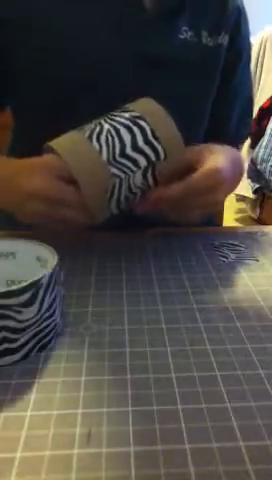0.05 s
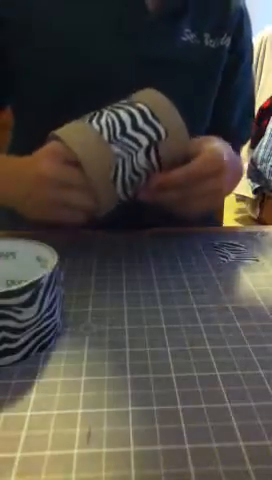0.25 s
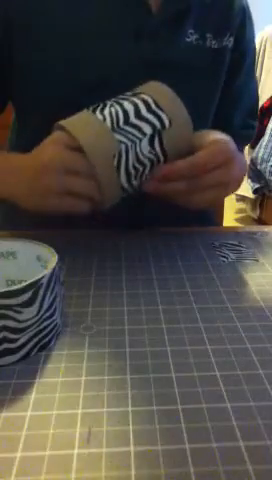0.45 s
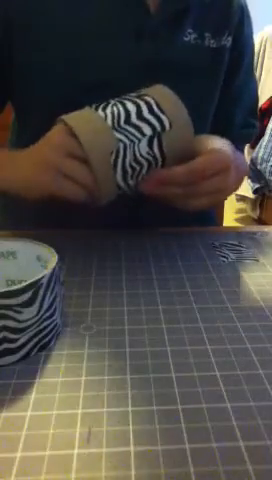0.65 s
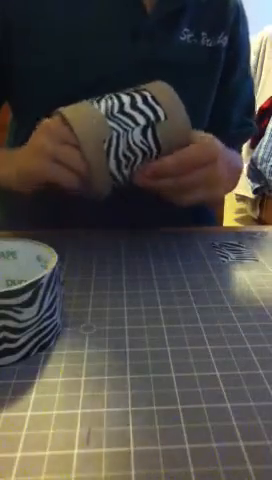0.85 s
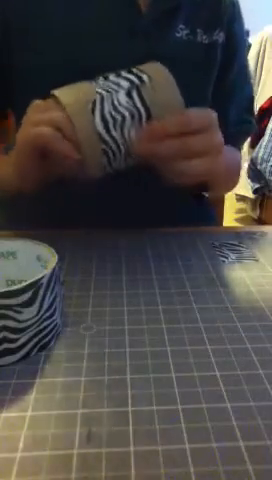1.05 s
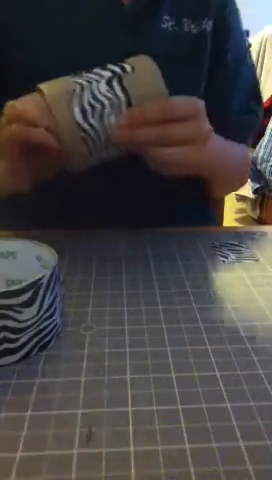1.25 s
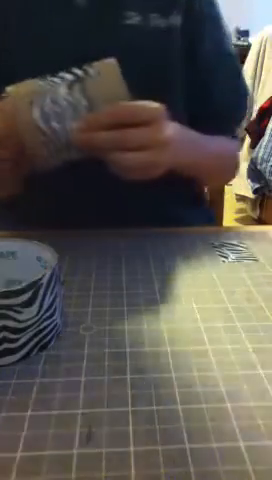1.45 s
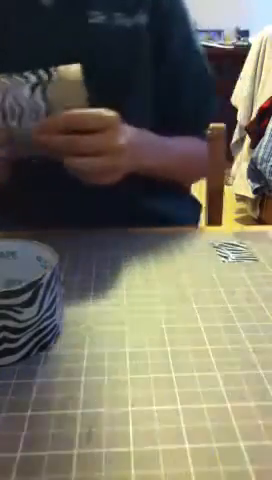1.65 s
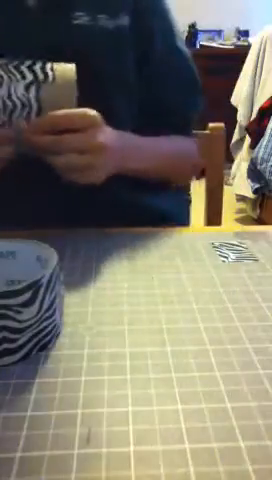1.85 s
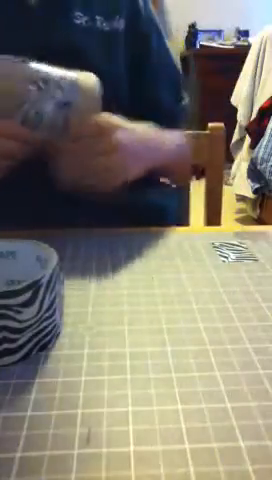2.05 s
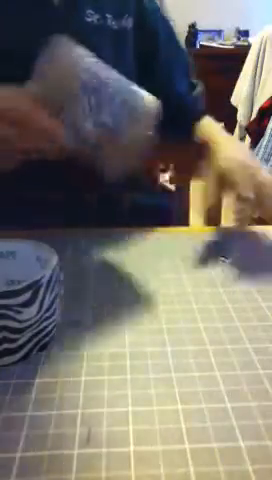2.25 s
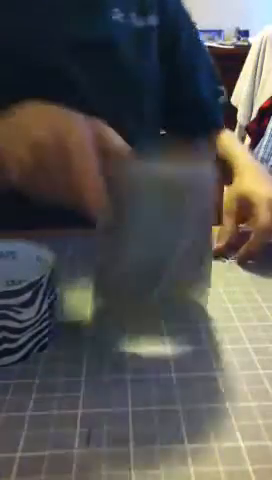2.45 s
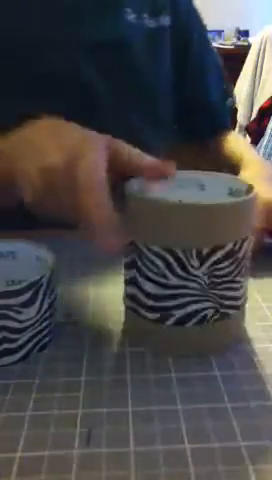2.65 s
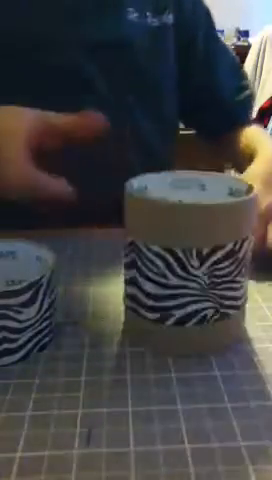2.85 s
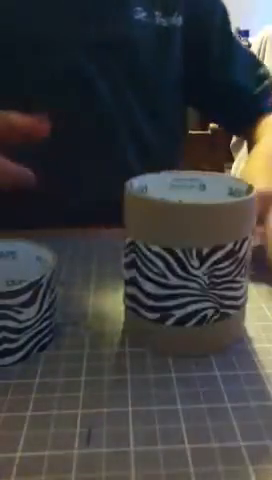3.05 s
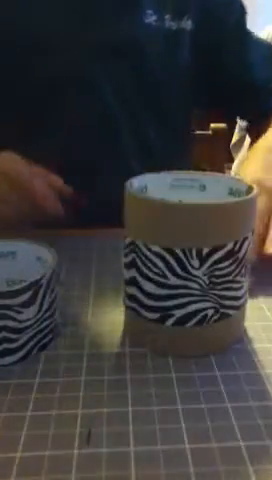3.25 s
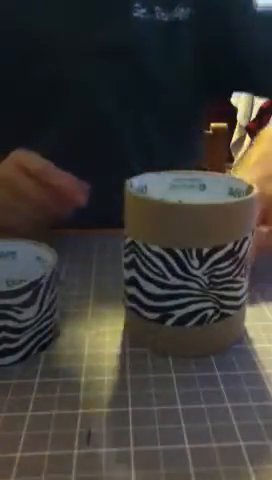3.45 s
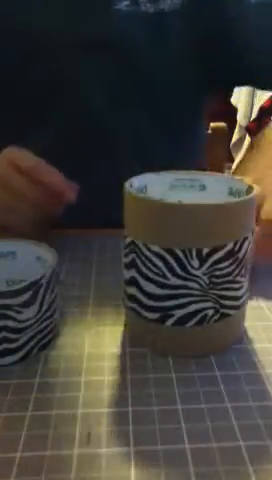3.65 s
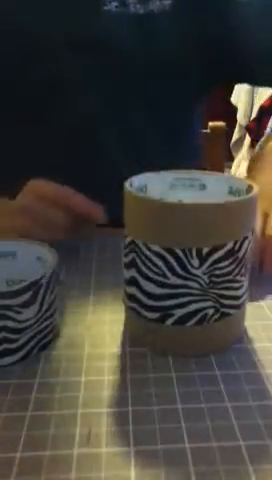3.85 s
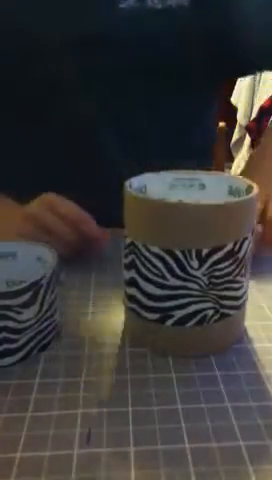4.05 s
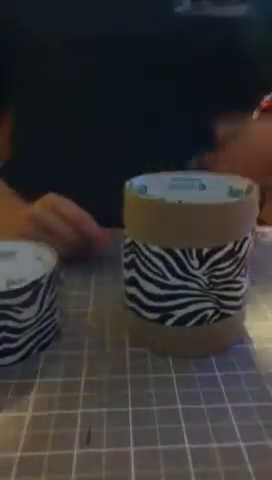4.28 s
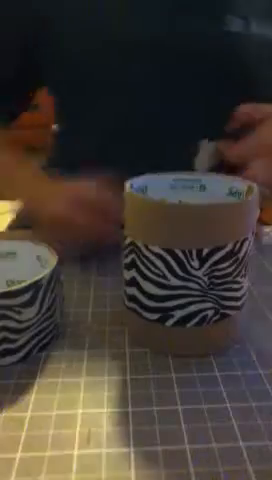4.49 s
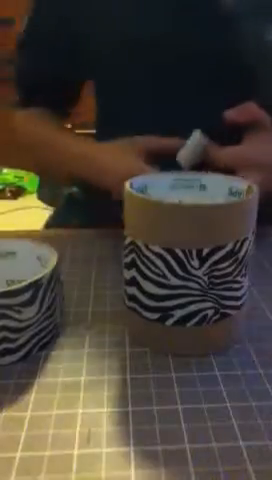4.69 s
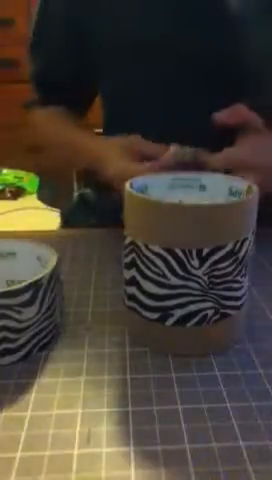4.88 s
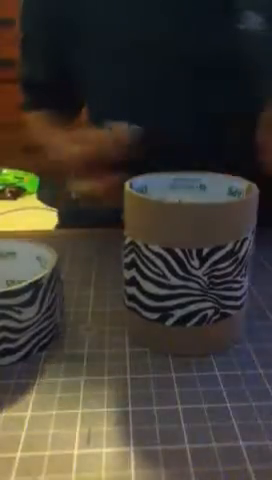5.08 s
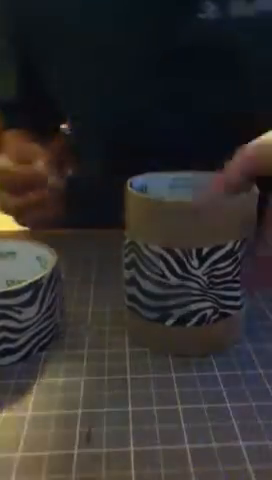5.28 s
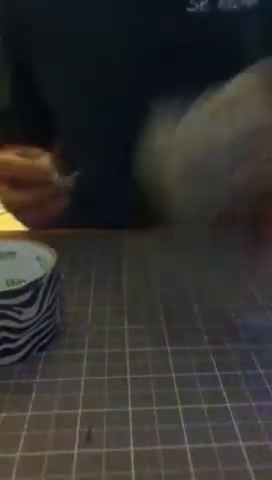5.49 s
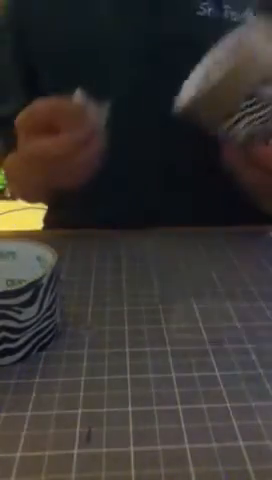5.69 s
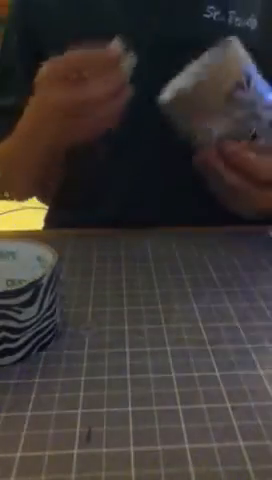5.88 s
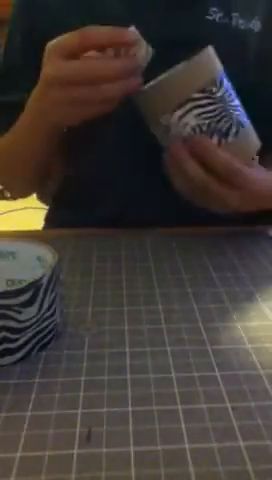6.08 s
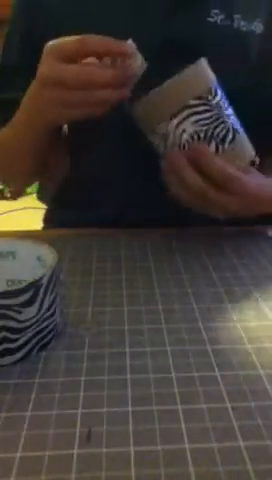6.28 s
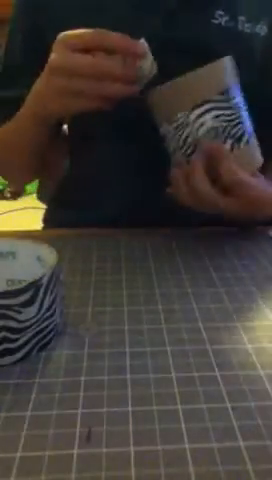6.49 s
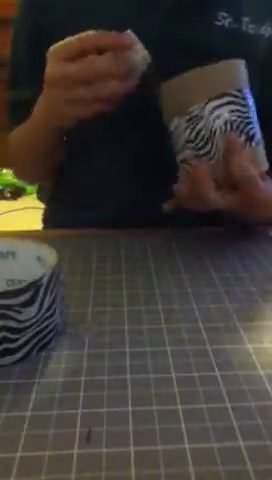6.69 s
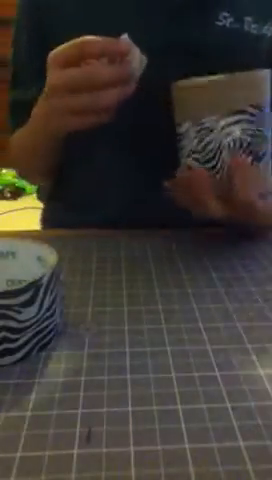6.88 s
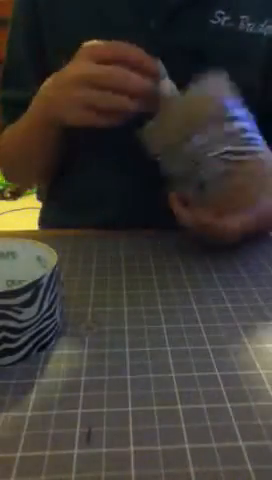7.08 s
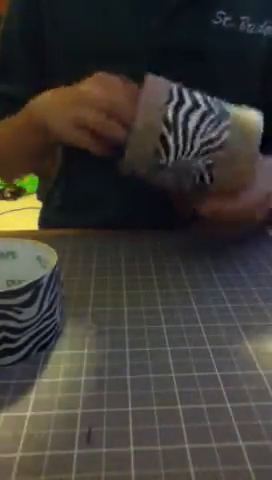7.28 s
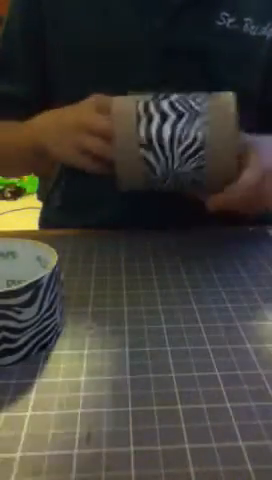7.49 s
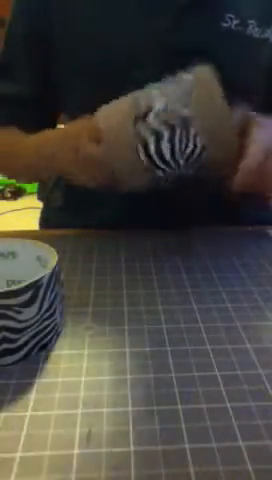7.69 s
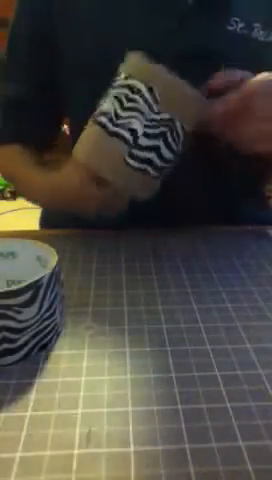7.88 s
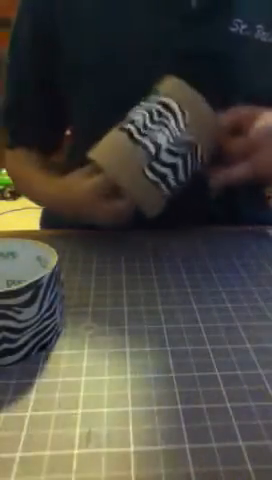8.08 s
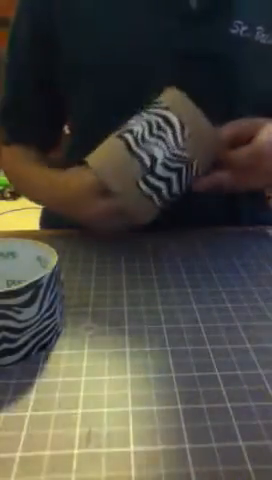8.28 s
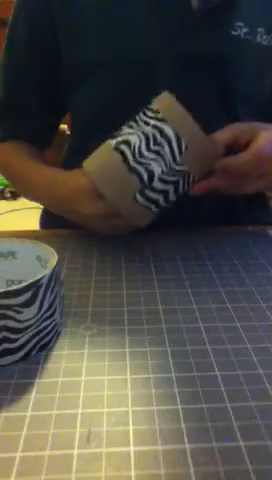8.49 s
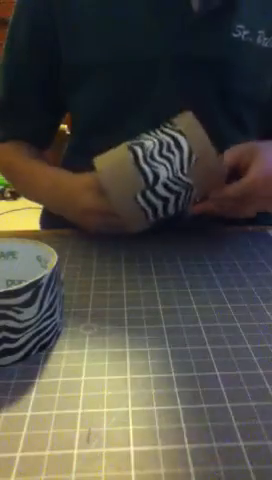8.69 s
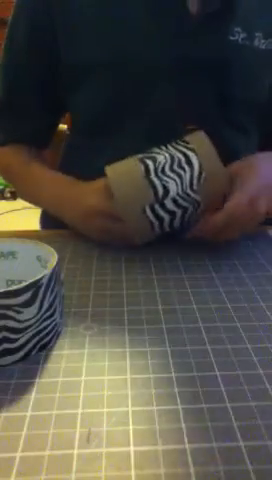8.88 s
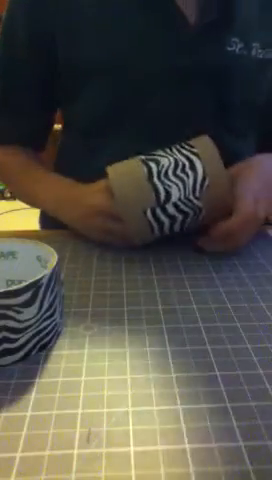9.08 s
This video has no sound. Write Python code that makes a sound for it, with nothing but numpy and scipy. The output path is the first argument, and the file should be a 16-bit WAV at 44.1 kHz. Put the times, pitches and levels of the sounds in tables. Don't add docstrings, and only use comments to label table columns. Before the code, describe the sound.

Soft skin-and-tape rustling, a loud hollow cardboard clack on a desk, nail picking and a short tape rip, then quieter rubbing in a humming room.

```python
import sys
import numpy as np
from scipy import signal
from scipy.fft import rfft, irfft
from scipy.io import wavfile
from scipy.ndimage import uniform_filter1d

SR = 44100
rng = np.random.default_rng(int(sys.argv[2]) if len(sys.argv) > 2 else 0)


def bounce(signal):
    frames = np.transpose(np.atleast_2d(signal))
    limited = np.clip(frames, -1, 1)
    pcm = np.round(limited * 32767).astype(np.int16)
    wavfile.write(sys.argv[1], SR, pcm)


def voltage_ratio(decibels):
    exponent = np.asarray(decibels, float) / 20
    return 10 ** exponent


N = 403118


def evened(x):
    return x / np.sqrt(np.mean(x ** 2) + 1e-20)


def read(points, hz):
    f, value = np.transpose(points)
    return np.interp(np.log(hz + 1), np.log(f + 1), value)


def add(mix, s, sound):
    part = mix[round(s * SR):][:len(sound)]
    part += sound[:len(part)]


def band(x, hz, width, count=1):
    for _ in range(count):
        x = signal.lfilter(*signal.iirpeak(hz, 1 / width, SR), x)
    return x


def patches(frames, bins, long, wide):
    field = rng.standard_normal((frames, bins)).T
    field = uniform_filter1d(uniform_filter1d(field, wide, 0), long, 1)
    return np.clip(evened(field), -2, 1.6)


def ring(modes, t, wave=np.sin):
    return sum(voltage_ratio(db - 60 * t / t60) * wave(2 * np.pi * hz * t) for hz, db, t60 in modes)


def room(x):
    # f/Hz, t60/s
    decay = [(150, 0.24), (1000, 0.21), (4000, 0.3), (12000, 0.31)]
    taps, spacing = np.zeros(SR // 2), 20
    at = np.arange(160, len(taps) - spacing, spacing)
    taps[at + rng.integers(0, spacing, len(at))] = rng.choice([-1., 1.], len(at))
    hz, t, z = signal.stft(taps, SR, nperseg=256)
    fade = voltage_ratio(-60 * t / read(decay, hz)[:, None])
    tail = signal.istft(z * fade, SR, nperseg=256)[1]
    return signal.fftconvolve(x, tail / np.linalg.norm(tail))[:N]


def hum():
    # f/Hz, level/dB
    air_colour = [(12, -33), (20, -27.5), (129, -7.5), (191, -5.5), (233, -1), (344, -7.5), (384, -9.5),
                  (567, -22), (617, -22.5), (1270, -31), (1780, -30), (2420, -31), (3020, -32.5),
                  (6600, -32.5), (15700, -37.5)]
    # f/Hz, width/Hz, level/dB
    resonances = [(233.8, 6.8, 5.5), (316, 13.4, 5), (380, 14, 4), (1083, 150, 8.5), (1280, 21, 8.5)]
    hz, t, z = signal.stft(rng.standard_normal(N), SR, nperseg=2048, noverlap=1536)
    colour = read(air_colour, hz)
    for f, width, db in resonances:
        colour = colour + db * np.exp(-.5 * ((hz - f) / width) ** 2)
    z = z * voltage_ratio(colour[:, None] + 1.2 * patches(len(t), len(hz), long=6, wide=8))
    noise = signal.istft(z, SR, nperseg=2048, noverlap=1536)[1][:N]
    return voltage_ratio(-50) * evened(noise)


def ticks():
    lags = (.02, .148, .275)
    # f/Hz, level/dB, t60/s
    metal = [(2078, 4.5, .45), (2340, 2.5, .2), (6520, 0, .12), (6150, -5, .1)]
    # first level/dB, second level/dB, third level/dB
    strikes = [(-86, -75, -90), (-73, -68, -69), (-90, -69, -73), (-76, -67, -70), (-76, -70, -79),
               (-82, -72, -90), (-90, -77, -79), (-88, -80, -90), (-84, -73, -73), (-82, -72, -76),
               (-82, -72, -79), (-77, -73, -75), (-90, -73, -79), (-79, -70, -77), (-83, -70, -71),
               (-84, -71, -79), (-78, -72, -78), (-77, -71, -71), (-90, -70, -90), (-78, -73, -69),
               (-90, -71, -81)]
    first_turn_s, turn_s = .03, .4246
    rise_s, held_s = .012, .085
    out, t = np.zeros(N), np.arange(SR // 3) / SR
    envelope = (1 - np.exp(-t / rise_s)) * np.exp(-(t / held_s) ** 4)
    chances = rng.standard_normal((len(strikes), 3, len(metal)))
    for turn, (row, chance) in enumerate(zip(strikes, chances)):
        for lag, db, spread in zip(lags, row, chance):
            modes = [(hz * (1 + .001 * c), mode_db + 1.2 * c, t60)
                     for (hz, mode_db, t60), c in zip(metal, spread)]
            add(out, first_turn_s + turn * turn_s + lag, voltage_ratio(db + 4.5) * ring(modes, t) * envelope)
    return out + 0.25 * room(out)


def sways():
    # t/s, level/dB, f/Hz, length/s
    shoves = [
        (3.438, -61, 55, .1),
        (3.909, -43.5, 53.6, 0.13),
        (4.335, -53, 52, 0.087),
        (5.072, -57, 50, 0.092),
        (5.37, -58, 60, 0.077),
        (5.862, -60, 40, 0.078),
        (5.998, -61, 40, 0.088),
        (6.19, -60, 51.4, 0.19),
        (8.616, -53, 40.4, 0.087),
    ]
    out = np.zeros(N)
    for s, db, hz, length in shoves:
        t = np.arange(0, length, 1 / SR)
        add(out, s, voltage_ratio(db) * np.sin(2 * np.pi * hz * t) * np.sin(np.pi * t / length) ** 2)
    return out


def thumps():
    # t/s, peak level/dB, f/Hz, t60/s
    bumps = [
        (2.465, -36.5, 145, 0.16),
        (3.416, -42, 116, 0.2),
        (3.915, -28, 126, 0.12),
        (3.933, -26.5, 165, 0.11),
        (4.067, -34, 127, 0.061),
        (5.398, -31.5, 128, 0.083),
        (6.736, -32, 237, 0.056),
        (8.956, -35, 134, 0.12),
    ]
    out, t = np.zeros(N), np.arange(SR // 4) / SR
    for s, db, hz, t60 in bumps:
        body = ring([(hz, 0, t60), (1.1 * hz, -5, 1.06 * t60)], t)
        add(out, s, voltage_ratio(db) * body * (1 - np.exp(-t / 0.0092)))
    return out


def knocks():
    # t/s, level/dB, contact time/ms
    blows = [(2.4692, -36, 2.7), (2.558, -44, 0.59), (2.614, -32, 0.98), (2.6158, 0, 0.49),
             (2.6198, -37, 0.27), (2.624, -29, 0.69), (2.636, -34, 1), (2.65, -26, 1.6), (2.6869, -23, 3.2),
             (2.6921, -14, 1.74), (2.6989, -19, 0.8), (2.71, -28.5, 1.4), (2.7195, -19, 1.25),
             (2.734, -26.5, 1.3), (2.748, -33, 2.3), (2.9613, -41, 0.31), (3.926, -30, 1.24),
             (5.1358, -39, 0.42)]
    # f/Hz, level/dB, t60/s
    tube = [(163.5, -9.5, 0.1), (228, -4, 0.088), (285, -4, 0.092), (377, 0.5, 0.044), (544, -7.5, 0.043),
            (618, 1, 0.02), (700, -2.5, 0.055), (810, 2, 0.036), (860, -2.5, 0.056), (880, -10, 0.04),
            (1057, -6.5, 0.042), (1200, -14, 0.1), (1434, -13.5, 0.059), (1900, 3, 0.018),
            (2160, -1, 0.027), (2760, -17, 0.03), (3120, -14, 0.021), (3700, -9, .025)]
    damp_per_ms = 0.2
    out, t = np.zeros(N), np.arange(SR // 3) / SR
    low_rise = 1 - 0.5 * np.exp(-t / 0.0019)
    high_rise = 1 - np.exp(-(t / .001) ** 2)
    for (s, db, contact_ms), spot in zip(blows, rng.standard_normal((len(blows), len(tube)))):
        damping = 1 + damp_per_ms * contact_ms
        modes = [(hz, mode_db + c, 0.98 * t60 / damping)
                 for (hz, mode_db, t60), c in zip(tube, spot)]
        low = ring(modes[:12], t, np.cos) * low_rise
        high = ring(modes[12:], t, np.cos) * high_rise
        push = np.sin(np.pi * np.minimum(np.arange(200) / (contact_ms * SR / 1000), 1)) ** 2
        sound = np.convolve(low + high, push / push.sum())
        add(out, s, voltage_ratio(db) * sound / abs(sound).max())
    return signal.lfilter(*signal.butter(3, 80, "high", fs=SR), out)


def creak_slips():
    # t/s, time between slips/s, peak level/dB, f/Hz, t60/s
    runs = [
        (3.2827, 0.0074, -48.5, 3000, 0.034),
        (3.3788, 0.013, -46.5, 3070, 0.0082),
        (3.422, 0.015, -49, 2900, 0.014),
    ]
    slips_each, treble_db, uneven = 3, -33, 0.062
    slips = []
    for (s, gap, db, hz, t60), run in zip(runs, rng.standard_normal((len(runs), slips_each, 3))):
        for k, (a, b, c) in enumerate(run):
            at = s + gap * (k + uneven * a * (k > 0))
            slips.append((at, db + 1.5 * b, hz * (1 + 0.041 * c), treble_db, t60))
    return slips


def snaps():
    # t/s, peak level/dB,
    # f/Hz, treble level/dB
    glue = [(0.3772, -53, 2750, -16), (0.8755, -43, 3900, -6), (1.23, -44, 2900, -10),
            (1.235, -45, 2700, -4), (1.249, -45, 4100, -14), (1.351, -47, 4600, -20),
            (1.488, -46, 4300, -20), (1.522, -46, 4600, -20), (1.2726, -43, 4290, -6),
            (1.285, -41.5, 4550, -6.5), (1.3305, -32, 3600, -17), (1.3553, -32, 5200, -24),
            (1.481, -40, 5340, -16), (1.498, -47, 5300, -14), (1.513, -48, 4300, -12),
            (1.549, -44, 4600, -16), (1.316, -50, 9000, -8), (1.392, -41, 4200, -16),
            (1.532, -46, 5350, -18), (1.543, -46, 6650, -16), (1.5554, -41, 4800, -9),
            (1.571, -46, 4500, -12), (1.372, -41, 5200, -16), (1.302, -47, 4000, -12),
            (1.858, -45.5, 3120, -27), (1.883, -44, 2900, -15), (1.9124, -44.5, 4500, -11),
            (1.9773, -47, 5800, -8), (2.012, -43, 5840, -17), (2.108, -56, 3090, -15),
            (2.1607, -39, 4080, -19), (2.364, -42, 10100, -23), (2.619, -34, 3000, -34),
            (5.9658, -52, 9100, -10), (6.5443, -44, 6900, -14), (6.7362, -53, 1100, -4),
            (6.93, -48, 1900, -20), (7.0454, -50, 3180, -15), (7.189, -47, 7130, -15),
            (7.284, -42, 6320, -15), (7.29, -47, 5900, -12), (7.486, -49, 6520, -12),
            (7.729, -38.5, 5200, -18), (7.781, -48, 6500, -16), (7.7935, -38, 5700, -14),
            (8.255, -46, 1900, -11), (8.344, -45.5, 7760, -17), (8.968, -50, 2960, -5)]
    # t/s, peak level/dB, f/Hz, treble level/dB, t60/s
    nails = [(2.47, -37.5, 3940, -30, .016), (2.5553, -51, 2070, -16, .01),
             (2.6164, -13, 2700, -20.5, 0.018), (2.9622, -25, 11900, -30, 0.011),
             (2.9625, -32, 1950, -30, 0.02), (2.9623, -31, 5200, -22, .016), (2.9722, -44, 5500, -12, .014),
             (2.9835, -50, 2560, -4, .06), (3.9248, -36.5, 2580, -28, .014), (3.9265, -51, 890, -30, .04),
             (3.999, -45, 2480, -8, .013), (4.036, -32.5, 2880, -19, 0.012),
             (4.0428, -29.5, 2860, -10, .012), (4.0545, -34.5, 2880, -4.5, .018),
             (4.0732, -23.5, 3330, -10, 0.0094), (4.091, -29, 2900, -19, .012),
             (4.1, -34.5, 2300, -9, 0.079), (4.1362, -33.5, 2660, -18, 0.017),
             (4.1477, -40, 6620, -17, .025), (4.196, -44, 2440, -18, 0.022), (4.215, -33, 1490, -27, .03),
             (4.2155, -37, 3100, -20, .02), (4.237, -37, 2100, -20, 0.092),
             (4.2637, -30.5, 2040, -24, 0.018), (4.2995, -38, 1930, -9, .015),
             (4.346, -26, 6490, -30, .013), (4.351, -19, 2620, -29, 0.011), (4.364, -21, 3400, -9, 0.02),
             (5.074, -35, 4570, -15, 0.012), (5.0762, -33, 4550, -15, 0.028), (5.078, -40, 2200, -14, .012),
             (5.082, -39, 5070, -18, .03), (5.1155, -39, 4200, -10, .006), (5.1358, -31, 3200, -6.5, 0.009),
             (5.136, -32.5, 2000, -23, 0.0068), (5.404, -47, 3000, -3, .016),
             (5.4213, -32, 5600, -18, .008), (5.4216, -44, 1990, -20, .012),
             (5.4335, -37, 10400, -14, .045), (5.4433, -34.5, 10400, -11, .014),
             (5.4435, -51, 5600, -20, .014), (5.47, -49, 6500, -5, 0.11)]
    glue_t60_s, rise_s = 0.024, 0.00027
    tail, first_share = .5, .09
    widest_hz = 4000
    out, t = np.zeros(N), np.arange(2000) / SR
    edge = 5.2 * (np.arange(len(t)) == round(2 * rise_s * SR))
    rows = [(*row, glue_t60_s) for row in glue] + nails + creak_slips()
    noises = rng.standard_normal((len(rows), 2, len(t)))
    for (s, db, hz, treble_db, t60), (a, b) in zip(rows, noises):
        fade = voltage_ratio(-60 * t / t60) * (1 - np.exp(-t / rise_s))
        fade = fade * (tail + np.exp(-t / (first_share * t60)))
        body = band((a + edge) * fade, hz, min(0.6, widest_hz / hz), count=2)
        crack = band((b + edge) * fade, 8800, 0.74, count=2)
        crack = voltage_ratio(treble_db + 9.5) * crack / abs(crack).max()
        add(out, s, voltage_ratio(db) * (body / abs(body).max() + crack))
    return out


def squeak():
    # t/s, length/s, f/Hz, width/Hz, level/dB
    songs = [(1.328, .1, 2680, 120, -64), (1.42, .06, 6500, 300, -65), (1.478, .05, 5350, 350, -60),
             (1.478, .03, 8900, 500, -64), (1.575, .065, 8900, 400, -63), (1.545, .045, 10000, 700, -63),
             (1.55, .045, 7200, 700, -63), (1.63, .03, 7800, 600, -61), (2.2, .05, 10300, 700, -59),
             (.86, .055, 10200, 600, -62), (2.255, .05, 8200, 400, -63), (2.18, .05, 2900, 250, -66),
             (7.2, .055, 8900, 500, -64), (7.665, .03, 8300, 300, -65), (2.69, .03, 2900, 300, -55),
             (2.63, .062, 9800, 550, -51), (2.65, .045, 8100, 400, -53), (2.672, .022, 9500, 500, -50),
             (2.715, .04, 9800, 600, -61), (4.213, .11, 1570, 200, -57), (4.218, .02, 5900, 250, -59),
             (4.232, .09, 2050, 220, -56), (4.37, .071, 1510, 150, -56), (4.372, .05, 4900, 700, -49),
             (4.377, .12, 2040, 260, -58), (4.1, .06, 2300, 400, -59), (4.8, .13, 1850, 450, -66),
             (5.459, .059, 2900, 150, -68), (6.92, .1, 2880, 60, -70), (6.92, .1, 5000, 60, -70),
             (7.1, .06, 8700, 600, -67), (7.19, .06, 7600, 1500, -62), (7.3, .07, 8200, 500, -68),
             (7.59, .14, 8200, 400, -65), (7.9, .13, 7200, 400, -66), (8.33, .1, 6500, 600, -67),
             (8.45, .12, 8100, 400, -68), (3.277, .022, 3100, 1300, -60), (3.282, .03, 1250, 300, -63),
             (3.435, .055, 1900, 300, -65), (4.214, .02, 1700, 500, -54), (2.63, .016, 2100, 300, -42),
             (1.57, .07, 4800, 2500, -62)]
    out = np.zeros(N)
    for (s, length, hz, width, db), noise in zip(songs, rng.standard_normal((len(songs), SR // 4))):
        t = np.arange(0, length, 1 / SR)
        tone = evened(band(noise, hz, width / hz, count=2)[-len(t):])
        add(out, s, voltage_ratio(db) * np.sqrt(np.sin(np.pi * t / length)) * tone)
    return out


def rip():
    # t/s, peak level/dB, t60/s
    tears = [(4.338, -25, .05), (4.3405, -25, .06), (4.3436, -18.5, 0.039), (4.347, -17.5, .035),
             (4.3505, -15.5, 0.06), (4.3568, -16, 0.028), (4.3578, -14.5, 0.032), (4.362, -11, 0.028),
             (4.3641, -11.5, 0.031), (4.366, -19, 0.013), (4.37, -16, 0.031), (4.378, -30, .04),
             (4.384, -22, 0.027)]
    # f/Hz, level per Hz/dB
    tape = [(180, -41), (300, -2.5), (492, -15), (744, -2), (1590, -11.5), (1870, -4.5), (2040, -1),
            (2400, -7), (3230, 2), (4070, -11), (5130, 1), (6790, -6.5), (7500, -23), (9290, -12),
            (15500, -53)]
    rise_s, tail, jolt_s = 0.0012, .5, .002
    out, t = np.zeros(N), np.arange(3000) / SR
    colour = voltage_ratio(read(tape, np.fft.rfftfreq(len(t), 1 / SR)))
    onset = (1 - np.exp(-t / rise_s)) * (tail + np.exp(-t / jolt_s))
    for (s, db, t60), noise in zip(tears, rng.standard_normal((len(tears), len(t)))):
        tearing = evened(irfft(rfft(noise) * colour, len(t)))
        add(out, s, voltage_ratio(db - 6.0 - 60 * t / t60) * onset * tearing)
    return out


def skin(hz, body_db, hiss_db):
    centres = (500, 1900, 4600, 9500, 15500)
    levels = (body_db + 3.0, body_db - 2.0, 0, hiss_db + 0.5, hiss_db - 19)
    return voltage_ratio(read(list(zip(centres, levels)), hz))


def pressure(rows, colour, hz, t):
    body_per_bright, hiss_per_bright = -0.68, 0.94
    edge_db, edge_curve = 23, 1.11
    s, db, rise, fall, bright = np.transpose(rows)[:, :, None]
    away = np.where(t < s, (s - t) / rise, (t - s) / fall)
    tone = [skin(hz, colour[0] + body_per_bright * b, colour[1] + hiss_per_bright * b)
            for b in bright[:, 0]]
    return np.transpose(tone) ** 2 @ voltage_ratio(db - edge_db * away ** edge_curve) ** 2


def rub():
    # firmest t/s, level/dB, rise/s, fall/s, brightness/dB
    strokes = [(.41, -71, .5, .07, -8), (.586, -59.5, 0.067, 0.21, 2), (.882, -56.5, 0.066, 0.063, 0.5),
               (1.235, -53, 0.029, 0.091, -4), (1.365, -51.5, 0.2, 0.18, -0.5),
               (1.49, -54.5, 0.032, 0.44, -2.5), (1.635, -60, 0.22, 0.034, 5),
               (2.19, -56.5, 0.78, 0.22, -3.5), (2.23, -57, 0.087, 0.17, 8.5), (2.374, -56, 0.04, 0.038, 2),
               (2.472, -58, 0.019, 0.077, -4), (2.58, -63, 0.34, 0.13, 0), (5.976, -70, 0.051, 0.088, 6),
               (6.19, -70.5, .3, .4, 2.5), (6.562, -65, 0.13, 0.082, 3), (6.744, -52.5, 0.035, 0.024, -4.5),
               (7.0, -65, 0.22, .05, -6), (7.2, -62, 0.33, 0.47, 5.5), (7.79, -60, 0.87, 0.22, 4.5),
               (8.01, -58.5, 0.19, 0.026, 8), (8.25, -62.5, 0.6, 0.18, 4), (8.5, -63.5, 0.94, 0.15, 0.5),
               (8.63, -66, 0.04, 0.14, -7), (8.98, -58.5, 0.28, 0.2, -5.5)]
    # firmest t/s, level/dB, rise/s, fall/s, brightness/dB
    slides = [(2.968, -51.5, 0.012, 0.047, 6), (3.304, -65.5, 0.079, 0.081, -21),
              (3.378, -71, .01, 0.24, -14), (3.925, -50.5, 0.026, 0.2, -6),
              (4.07, -44.5, 0.047, 0.21, -1.5), (4.22, -50, 0.025, 0.46, -6.5), (4.31, -51, 0.11, 0.07, -9),
              (4.375, -41, 0.0088, 0.066, 3.5), (4.43, -70, .03, 0.073, 1), (4.555, -55.5, 0.081, 0.097, 2),
              (4.9, -64, 1, 0.27, -8), (5.066, -55.5, 0.027, 0.13, -7.5), (5.141, -63, .1, .06, 0),
              (5.39, -62, 0.58, .02, -3), (5.428, -51, 0.04, 0.18, -0.5), (5.706, -58.5, 0.036, 0.14, 2.5)]
    # peak t/s, level/dB, rise/s, fall/s, brightness/dB
    settles = [
        (2.622, -42, 0.0079, 0.062, -4.5),
        (2.66, -56.5, 0.11, .07, 2.5),
        (2.692, -47.5, 0.043, 0.032, -2),
        (2.722, -54, .012, 0.043, -6),
    ]
    slips = voltage_ratio(np.minimum(rng.exponential(1, N), 3.5))
    slips = slips * (rng.random(N) < 3500 / SR)
    drive = rng.standard_normal(N) * np.sqrt(.5 + evened(uniform_filter1d(slips, size=30)) ** 2)
    hz, t, z = signal.stft(evened(drive), SR, nperseg=256, noverlap=192)
    # (hollow body dB, fine hiss dB)
    power = (voltage_ratio(-75) * skin(hz, 13.6, 1.2)[:, None]) ** 2
    power = power + pressure(strokes, (-0.92, -0.3), hz, t)
    power = power + pressure(slides, (1, -2), hz, t)
    power = power + pressure(settles, (9.7, 7.7), hz, t)
    grain_db = 1.76 * patches(len(t), len(hz), long=50, wide=3)
    flutter_db = 1.6 * patches(len(t), len(hz), long=14, wide=24)
    z = z * np.sqrt(power) * voltage_ratio(4.0 + grain_db + flutter_db) * (hz > 250)[:, None]
    return signal.istft(z, SR, nperseg=256, noverlap=192)[1][:N]


def scene():
    heavy = knocks() + thumps()
    floor = hum() + ticks() + sways()
    crisp = rip() + snaps()
    echo = room(voltage_ratio(-14.5) * crisp + voltage_ratio(-10.0) * heavy)
    return (crisp + heavy + echo + rub() + squeak() + floor)[None]


def top_cut(x):
    return signal.sosfilt(signal.butter(12, 15810, fs=SR, output="sos"), x)


def record(dry):
    low_pass = signal.firwin(511, 15790, window=("kaiser", 9), fs=SR)
    limited = signal.oaconvolve(np.tanh(dry), low_pass[None], "same")
    return top_cut(limited)


dry = scene()
out = record(dry)
bounce(out)
```